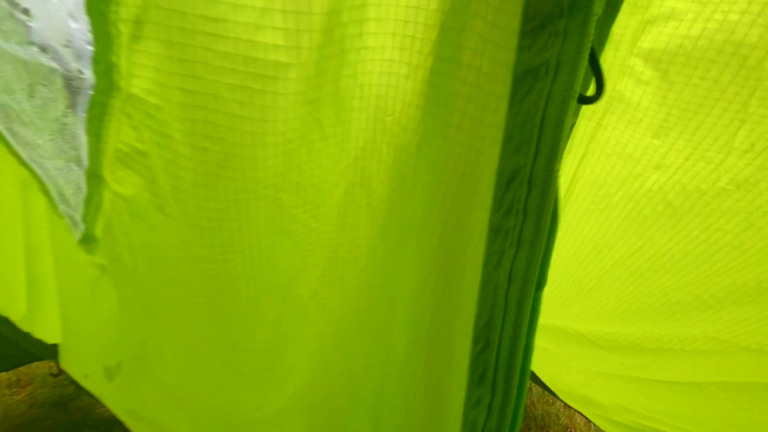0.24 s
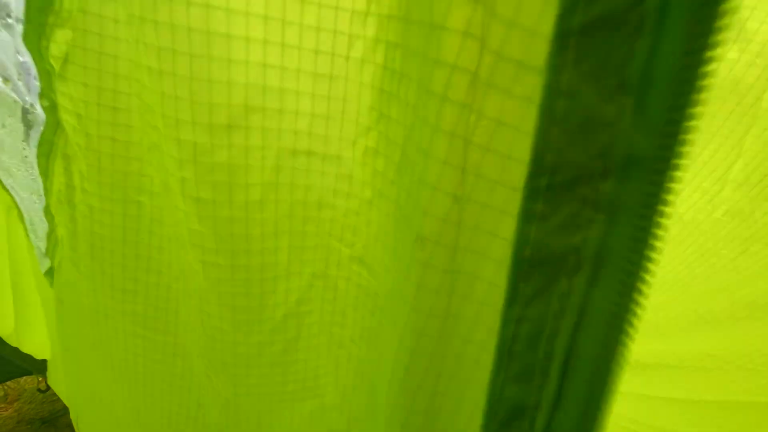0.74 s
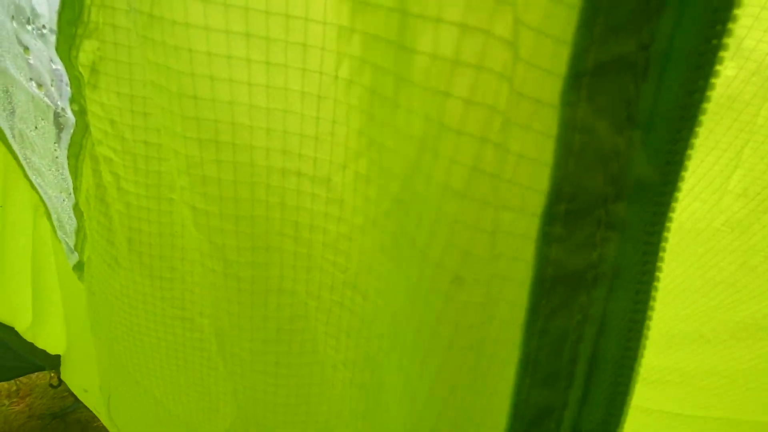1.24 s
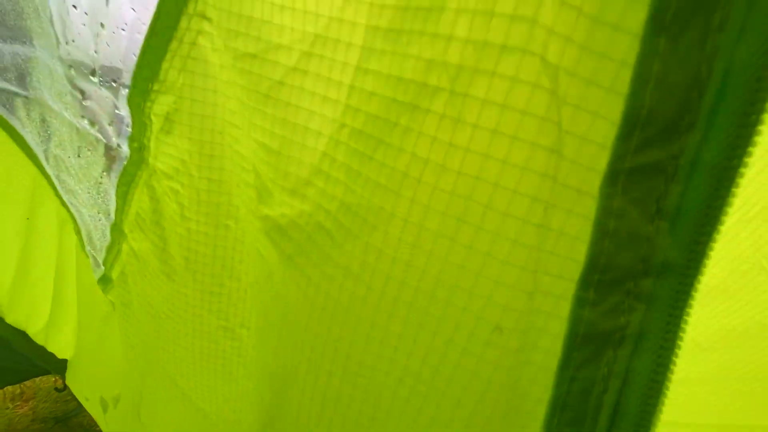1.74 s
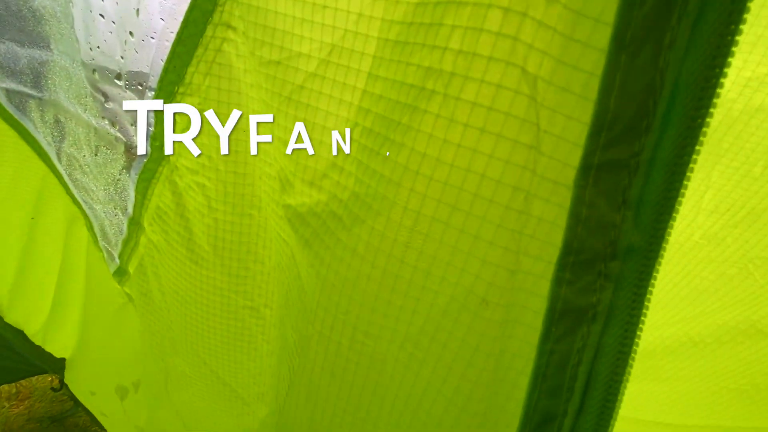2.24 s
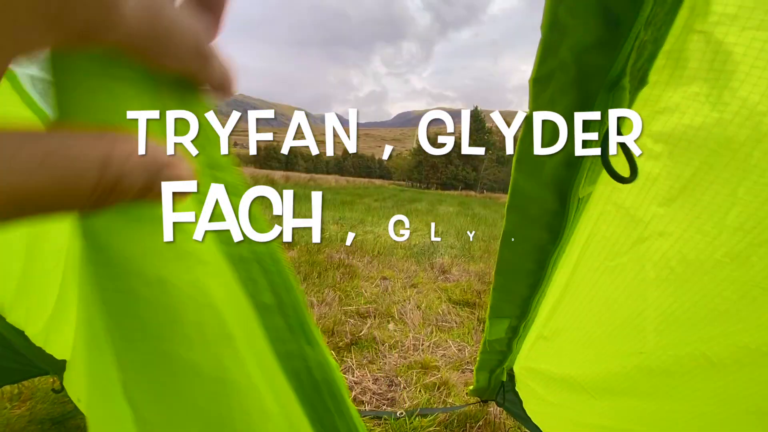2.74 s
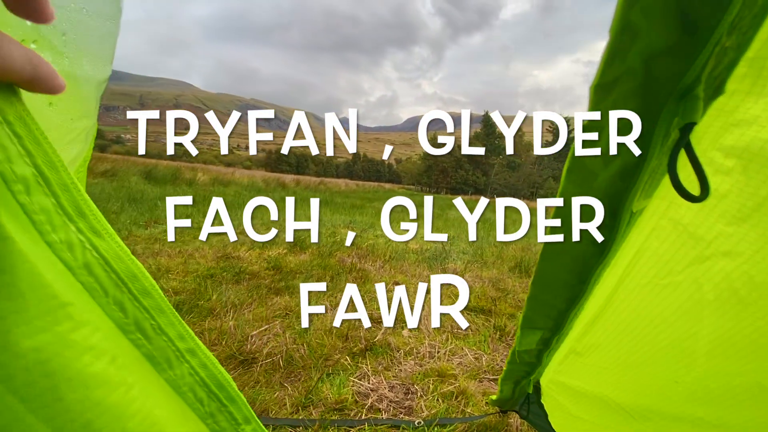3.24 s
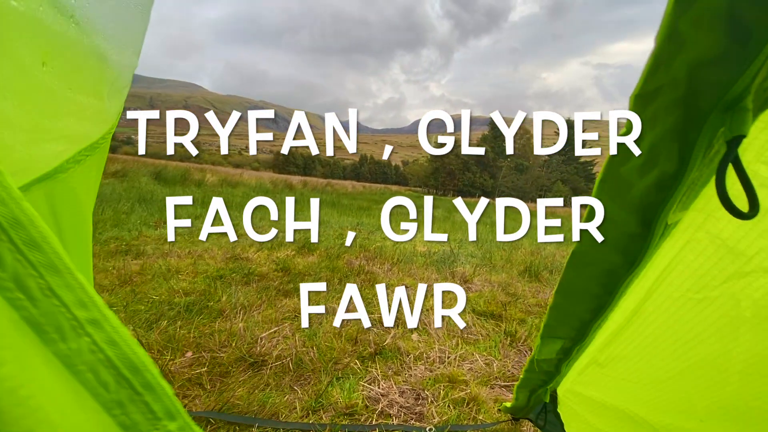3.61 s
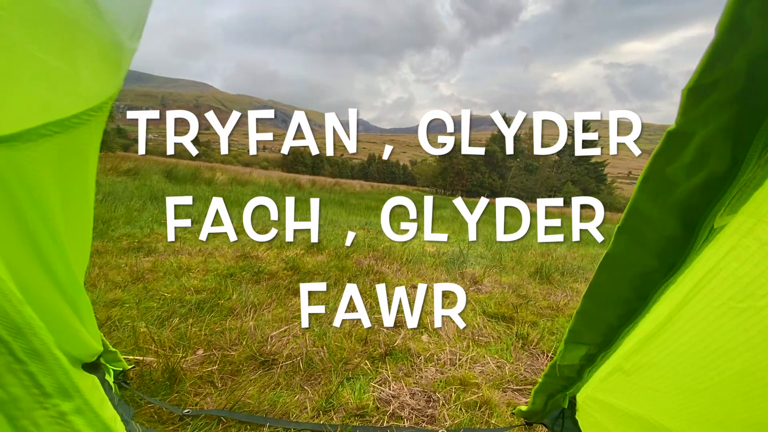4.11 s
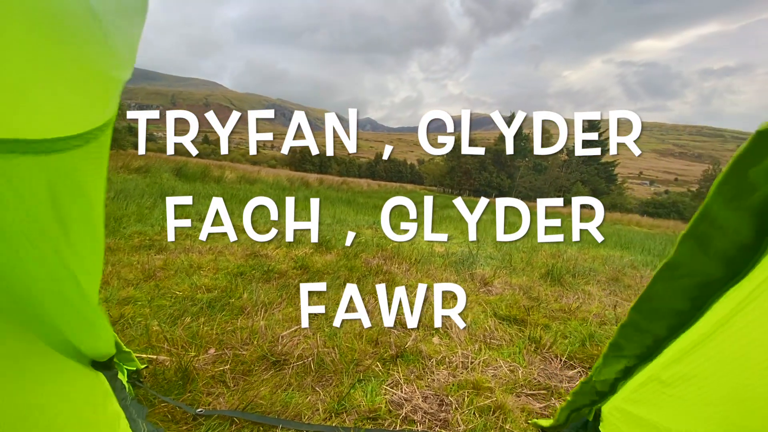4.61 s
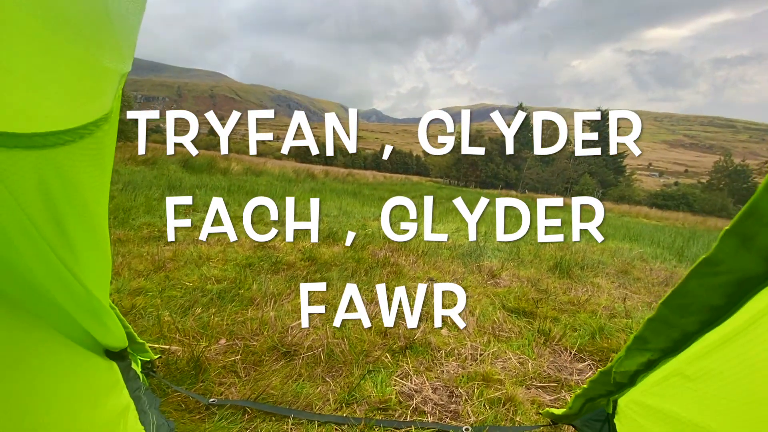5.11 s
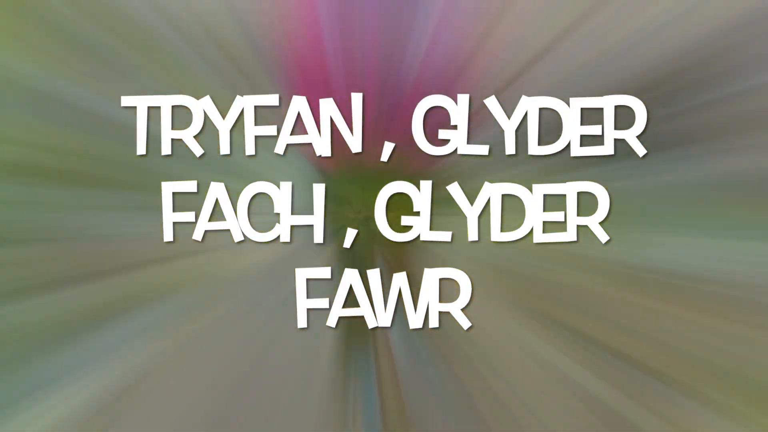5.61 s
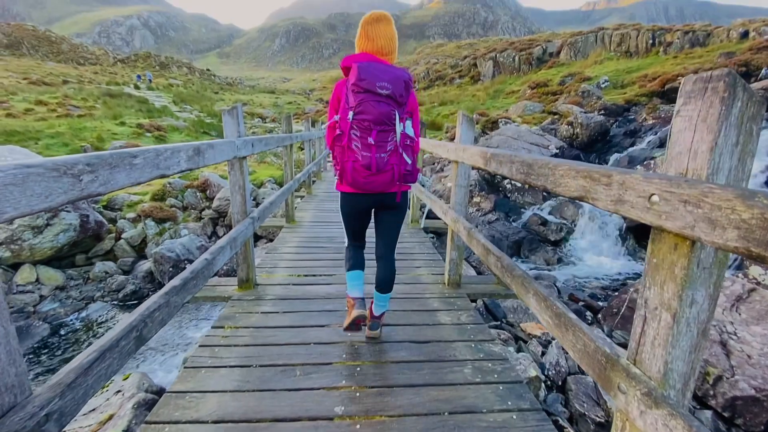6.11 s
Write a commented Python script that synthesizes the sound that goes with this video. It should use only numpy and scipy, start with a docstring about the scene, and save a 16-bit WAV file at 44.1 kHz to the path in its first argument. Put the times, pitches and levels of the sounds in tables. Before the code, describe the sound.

Close stereo sound from within a thin nylon tent: raspy zip bursts with low shakes of the taut wall, a quiet pause, fine ticks speeding up into a short high zip. After a bird-filled lull, fabric rubs and crackles, building to a violent run of snaps and thumps. Quiet outdoor air and quick chirps follow, then steady white water over rocks rises.

```python
"""Inside a small tent in open country: a zip is pulled in jerks, the door flap is swept aside and its stiff
fabric snaps close to the microphone; small birds and a far rumble outside. Then a mountain stream fades in.
Rubbing is banded noise, snaps and zip teeth are clicks and noise bursts through resonances, and the taut
wall answers with falling swings. Birds are bending sines; rumble and water are shaped noise."""
import sys
import numpy as np
from scipy import signal
from scipy.fft import rfft, irfft, next_fast_len
from scipy.io import wavfile

SR = 44100
rng = np.random.default_rng(int(sys.argv[2]) if len(sys.argv) > 2 else 0)


def wrap_up_sound(samples):
    """Save the sound to the file named by the first command line argument, as 16-bit audio."""
    columns = np.atleast_2d(samples).T
    # keep every value between -1 and 1, then stretch to whole-number steps
    tamed = np.clip(columns, -1, 1)
    steps = np.round(tamed * 32767).astype(np.int16)
    wavfile.write(sys.argv[1], SR, steps)


N = 280476
TIME_S = np.arange(N) / SR

# fabric snaps: (time [s], crack level [dB], body below 2300 Hz against the crack [dB], thump level [dB],
# left-right [dB])
FABRIC_SNAPS = [(2.5248, -27, -4, -52, -7), (2.985, -12, -8, -37, -5.5), (3.0882, 2, 7.5, -18.5, -8),
                (3.216, -11.5, 9.5, -34, 4), (3.228, -23, 14, -35, -9), (3.313, -26.5, 2, -40, 31),
                (3.331, -8, 7, -38, -3), (3.4713, 2.5, 4, -18, -5.5), (3.4994, -13, 9, -36, -2),
                (3.505, -14, 4, -45, -1), (3.545, -13, 0, -48, -4), (3.5509, -4.5, 8, -34, -0.5),
                (3.5783, -1, 5.5, -27, -3), (3.6531, 4, 0, -25, 2), (3.655, -19, 14.5, -42, -30),
                (3.683, 0, 6, -21.5, 0), (3.7085, -6.5, 4.5, -17, 12), (3.712, -1.5, 9, -28, -3),
                (3.7479, 2.5, -1, -19.5, 0), (3.782, -30, 2, -55, -8), (3.8852, -3, 10.5, -26.5, -2),
                (3.895, 0, 12.5, -25, -1.5), (4.009, -16, 3, -59, -3), (4.0532, 4, 0, -32, -2),
                (4.057, 0, 7.5, -26, 1), (4.078, -5.5, 5, -29, -4), (4.1105, -4.5, 7, -18.5, -14),
                (4.12, 7, 7.5, -17, 7), (4.1261, 6.5, 0.5, -15, -18), (4.15, -4, -12, -55, -1),
                (4.1622, -9, 4, -39, -10), (4.1738, 6, 3.5, -24.5, -5.5), (4.185, -15, 4, -48, -3),
                (4.2103, -1.5, 6, -23, -5), (4.23, -10, 9, -49, 2), (4.244, 0.5, 7.5, -25.5, -3),
                (4.277, 0, 7.5, -23, 1), (4.281, 4.5, 5, -30, -4), (4.292, -13, 12, -28, -1),
                (4.3247, 1, 1, -42, 1), (4.3279, 8.5, 9, -47, -5), (4.331, 9.5, 1, -14.5, 11),
                (4.337, 11.5, 1, -26, -2), (4.3406, 12, -4, -17, -23), (4.35, 10.5, 2, -17, 12),
                (4.3604, 5, 6, -17, 8), (4.3638, -1, -9, -41, 0), (4.369, 3, 7.5, -14, 10),
                (4.3724, -8, -2, -40, 10), (4.38, 0, 3, -25, 17), (4.388, -4, 7, -21, 11),
                (4.4005, 16.5, -4, -38, 11), (4.4009, 9.5, -23, -9, -6), (4.4562, -18, -8, -28, -2),
                (4.5624, -5.5, 13, -35, 0)]
# the flap tears free in one run of snaps: (time [s], level [dB])
TEAR_RUN = [(4.352, -36), (4.362, 0), (4.39, 8), (4.394, -2), (4.403, -31), (4.42, -38)]
# lead of the left port over the right for snaps: (frequency [Hz], phase [rad])
SNAP_LEFT_LEAD = [(0, 0), (1030, -3.0), (1720, -8.6), (2330, -7.4), (3360, -5.9), (4570, -6.7), (6800, 1.5),
                  (7580, 3.7), (8440, 7.5), (11900, 5.9), (12800, 3.5), (14300, 2.5), (15200, 0.1),
                  (15900, 0.1)]
SNAP_TREBLE_DB, TREBLE_DB_PER_DB = -2, -0.23   # treble against the crack; harder snaps are relatively duller
THUMP_LAG_S = 0.0012   # the wall answers a snap a moment later


def flap_snaps():
    """Sudden buckling of stiff fabric: a click and a noise burst ring its folds, then the wall thumps."""
    s, crack_db, body_db, thump_db, pan_db = np.transpose(FABRIC_SNAPS)
    clicks = np.array([impulses(s, crack_db + pan_db / 2), impulses(s, crack_db - pan_db / 2)])
    run_level = amp(in_time(TEAR_RUN)[0] + 1.6 * drift(120))
    run = run_level * (rng.random(N) < 700 / SR)   # about 700 snaps per second, at random
    noise = bursts(clicks + run * sides(-9.0), rise_s=0.0003, decay_s=0.0012, apart=0.55)
    noise = noise + amp(15.0) * clicks   # a sharp click heads each snap
    body_now_db = np.interp(TIME_S, s, body_db)
    treble_now_db = np.interp(TIME_S, s, SNAP_TREBLE_DB + TREBLE_DB_PER_DB * crack_db)
    cracks = fabric_colour(noise, body_now_db, treble_now_db, spread_db=2.2)
    wall = thumps(s + THUMP_LAG_S, thump_db, start_hz=740, end_hz=97.6, fall_s=0.00298, decay_s=0.013)
    return two_ports(cracks, SNAP_LEFT_LEAD) + wall * sides(-11.5)


# resonances of a snap: (centre [Hz], width [Hz], level [dB])
FABRIC_RESONANCES = [(840, 146, -7), (2010, 370, -10), (2630, 248, 2.5), (2910, 390, -3), (3630, 320, -5),
                     (4650, 1770, -8), (7600, 510, -2.5), (8470, 370, -3.5), (10200, 570, -7),
                     (13100, 1600, -8.5)]


def fabric_colour(x, body_db, treble_db, spread_db):
    """Parallel resonances of the stiff fabric; their strengths wander as the folds change."""
    out = 0
    for k, (hz, width_hz, db) in enumerate(FABRIC_RESONANCES):
        tilt_db = body_db * (hz < 2300) + treble_db * (hz > 6000)
        strength = amp(db + tilt_db + spread_db * drift(53.0))
        out = out + (-1) ** k * resonance(strength * x, hz, width_hz)
    return out


# the flap slides over the hand, rustles between the snaps, slides again and settles:
# (time [s], rasp level [dB], top hiss against the rasp [dB])
FLAP_RUB = [(2.352, -49, 8), (2.368, -45, 8), (2.412, -38, 4), (2.544, -47, -2.5), (2.564, -42.5, 5),
            (2.638, -42, 5), (2.65, -32.5, 1), (2.684, -43, 1.5), (2.744, -39.5, 7.5), (2.97, -42, -0.5),
            (3.28, -45.5, -6.5), (3.628, -38.5, -2), (3.738, -43.5, -5), (4.07, -44, -5), (4.122, -33, -3),
            (4.2, -38, -4), (4.26, -32.5, -4.5), (4.364, -31, 9.5), (4.41, -24, -8), (4.42, -33, -4),
            (4.452, -37, -1), (4.467, -27.5, -2), (4.551, -32.5, 6), (4.572, -30.5, -8), (4.585, -42, -3),
            (4.64, -47, -2), (4.773, -42.5, -2), (5.093, -51, -2.5), (5.145, -57, -9), (5.239, -58, 6),
            (5.4, -59, 7)]
# noise colour of the rubbing flap: (frequency [Hz], relative density [dB])
FLAP_SPECTRUM = [(18, -42), (30, -17), (59, -7.5), (157, -22), (199, -20.5), (336, -19.5), (988, -17),
                 (2010, -22), (2750, -18.5), (6050, -27.5), (11400, -23.5), (13300, -40), (14800, -40),
                 (16000, -15)]
# likeness of the two sides: (frequency [Hz], correlation [-1 to 1])
FLAP_CORRELATION = [(60, 0.91), (180, 0.38), (550, -0.12), (1650, -0.44), (4970, 0.11), (15000, 0.015)]
# shake, low rasp and hiss: (level at the mean rasp [dB], share of the rasp's swing followed [ratio])
FLAP_FOLLOWERS = [(-41.5, 1.46), (-45.5, 1.38), (-42.5, 1.19)]
# where the flap rubs: (time [s], left-right [dB])
FLAP_PAN = [(2.35, -1.5), (3.1, -0.5), (4.4, 2.5), (4.5, 1), (4.65, 0.5), (5.2, -1)]


def flap_rub():
    """Friction of sliding fabric: five ranges of grainy noise, four of them moving between the sides."""
    rasp_db, top_db = in_time(FLAP_RUB)
    shake_db, low_db, hiss_db = follow(rasp_db, FLAP_FOLLOWERS)
    grain = crumple(smooth_db=2.0, rate=17, per_s=60, click_db=-20.0, size=2)
    levels_db = [shake_db, low_db, rasp_db, hiss_db, rasp_db + top_db]
    shake, *rubbing = rubbed(levels_db, FLAP_SPECTRUM, FLAP_CORRELATION, grain, patchy_db=1.64)
    pan_db = np.interp(TIME_S, *np.transpose(FLAP_PAN))
    return shake * sides(2.1) + sum(rubbing) * sides(pan_db)


# zip pulls, two quick and one slow that ends in a jerk:
# (time [s], shake level of the tent wall [dB], rasp level [dB])
ZIP_PULLS = [(0, -4, -27), (0.022, -32, -35.5), (0.09, -15, -33), (0.16, -28, -29.5), (0.2, -24.5, -27),
             (0.25, -29, -34.5), (0.378, -20.5, -30.5), (0.44, -27, -47), (0.466, -52, -46.5),
             (0.51, -23.5, -47.5), (0.572, -29, -34.5), (0.652, -33, -35.5), (0.688, -25, -45),
             (0.722, -41, -61), (0.8, -50, -83), (0.862, -36, -64), (1.046, -31, -49), (1.132, -35, -55.5),
             (1.144, -23.5, -50), (1.25, -26.5, -39.5), (1.31, -23.5, -47.5), (1.37, -25.5, -45),
             (1.46, -32.5, -29), (1.532, -32, -34), (1.568, -29, -65), (1.62, -45, -60)]
# noise colour of the zip: (frequency [Hz], relative density [dB])
ZIP_SPECTRUM = [(18, -33), (30, -32), (59, 6), (227, -9.5), (364, -2), (426, -61), (486, -10.5),
                (4080, -14), (6050, -24.5), (10500, -5), (12000, -73), (13300, -59), (14800, -47),
                (16000, -45)]
# likeness of the two sides: (frequency [Hz], correlation [-1 to 1])
ZIP_CORRELATION = [(60, 0.76), (180, 0.55), (550, 0.67), (1650, 0.49), (4970, 0.012), (15000, 0.15)]
# low rasp, hiss and top hiss: (level at the mean rasp [dB], share of the rasp's swing followed [ratio])
ZIP_FOLLOWERS = [(-37.5, 0.9), (-41, 0.87), (-43, 0.87)]
TOOTH_PULSE_DB = 0.5   # the rasp swells with each passing tooth


def zip_rasp(turns):
    """Teeth pass the slider in grainy friction noise, while the pull shakes the tent wall."""
    grain = crumple(smooth_db=1.5, rate=21, per_s=210, click_db=-32.0, size=3.5)
    grain = grain * amp(TOOTH_PULSE_DB * np.cos(2 * np.pi * turns))
    shake_db, rasp_db = in_time(ZIP_PULLS)
    low_db, hiss_db, top_db = follow(rasp_db, ZIP_FOLLOWERS)
    levels_db = [shake_db, low_db, rasp_db, hiss_db, top_db]
    parts = rubbed(levels_db, ZIP_SPECTRUM, ZIP_CORRELATION, grain, patchy_db=2.0)
    shake, low, rasp, hiss, top = parts
    return shake * sides(-5.5) + (low + rasp) * sides(-0.96) + hiss * sides(0.47) + top * sides(-4.0)


# single zip teeth in the slow pull:
# (time [s], tick level [dB], slider ring level [dB], thump level [dB])
SLOW_TEETH = [(0.8528, -41, -55, -30), (0.912, -40, -46, -24), (0.954, -41.5, -36, -26),
              (0.992, -40, -36, -23), (1.024, -38, -46, -38), (1.044, -44, -50, -43),
              (1.051, -42, -19.5, -54), (1.081, -45, -46, -45), (1.107, -36, -49, -26),
              (1.1386, -34.5, -34, -37), (1.149, -36, -43, -42), (1.168, -35, -43, -24),
              (1.1791, -34, -39, -22), (1.189, -31, -43, -33), (1.198, -32.5, -39, -38),
              (1.206, -32.5, -40, -28), (1.221, -37, -36, -29), (1.233, -35, -37, -33),
              (1.244, -31, -32, -25), (1.251, -35, -35, -31), (1.265, -39, -37, -40),
              (1.2792, -29, -28, -24), (1.2864, -33, -22.5, -21), (1.295, -35, -24, -35),
              (1.317, -34, -24, -42), (1.334, -30, -22, -25), (1.341, -36, -32, -32),
              (1.355, -45, -41, -43), (1.377, -35, -36, -40), (1.388, -36, -34, -39),
              (1.397, -32, -32, -27), (1.413, -35, -19.5, -38)]


def zip_teeth():
    """In the slow pull each tooth ticks, rings slider and tape, and makes the wall swing."""
    s, tick_db, ring_db, thump_db = np.transpose(SLOW_TEETH)
    ticks = bursts(impulses(s, tick_db)[None], rise_s=0.00051, decay_s=0.0039, apart=0.67)
    ring = bursts(impulses(s, ring_db)[None], rise_s=0.0002, decay_s=0.0022, apart=1.0)
    ticks = signal.sosfilt(signal.butter(1, [400, 10500], "band", fs=SR, output="sos"), ticks)
    slider = resonance(ring, 5200, 2800)
    tape = amp(20.5) * resonance(ticks, 670, 380)
    swings = thumps(s, thump_db, start_hz=230, end_hz=86.0, fall_s=0.0027, decay_s=0.029)
    return (ticks + slider + tape) * sides(0.47) + swings * sides(-5.5)


# speed of the quick pulls and the closing jerk, one table each:
# (time [s], teeth per second [Hz], buzz level [dB])
QUICK_PULLS = [
    [(0, 93.8, -29), (.06, 97.3, -39), (.1, 109.9, -22.5), (.16, 120.7, -23.5), (.176, 201, -22.5),
     (.195, 255.4, -18.5), (.21, 289.2, -24), (.228, 216.4, -16.5), (.248, 177.6, -29.5), (.27, 116, -22.5),
     (.29, 232.3, -26), (.325, 149.8, -26.5), (.345, 197.2, -27.5), (.4, 194.1, -36), (.43, 110.2, -45)],
    [(.545, 92.7, -27), (.57, 148.7, -22), (.6, 239.2, -32), (.63, 228.4, -40.5), (.66, 235.6, -32),
     (.68, 179, -46)],
    [(1.415, 229.2, -23), (1.43, 297, -39), (1.447, 256.5, -28), (1.462, 351, -36), (1.475, 561.6, -30),
     (1.49, 476, -27), (1.5, 340, -25), (1.515, 386, -25), (1.527, 430, -28), (1.55, 249, -38)],
]


def tooth_turns():
    """Running count of passing teeth: the sum of an unsteady tooth rate, which also bridges the pulls."""
    s, hz, _ = np.transpose(sum(QUICK_PULLS, []))
    return np.cumsum(np.interp(TIME_S, s, hz) * (1 + 0.0144 * drift(56.6))) / SR


# ring of tape and slider at each tooth of a quick pull: (centre [Hz], width [Hz], level [dB])
TAPE_RESONANCES = [(870, 330, -6.5), (1500, 105, 0.5), (1750, 390, 1.5), (2530, 110, -4), (3530, 200, -15),
                   (4060, 200, -15)]
TAPE_WANDER_DB = 3   # the rings change strength as the tape bends
OVERTONE_DB = -6.5   # loss per doubling of the overtone number
TOOTH_CLICK_DB, TOOTH_SPREAD_DB = 18, 4.5   # click against the buzz; how unevenly the teeth bite


def zip_buzz(turns):
    """In a quick pull the teeth hum at their rate with uneven overtones, and click into tape and slider."""
    level = sum(amp(in_time(pull)[1]) for pull in QUICK_PULLS)
    tones = 0
    for k in range(1, 7):
        strength = amp(OVERTONE_DB * np.log2(k) + 3.1 * drift(31))
        tones = tones + strength * np.sin(2 * np.pi * k * turns)
    passing = np.diff(np.floor(turns), prepend=0)   # 1 at the sample where a tooth passes
    bites = passing * level * amp(TOOTH_CLICK_DB + TOOTH_SPREAD_DB * rng.standard_normal(N))
    clicks = 0
    for k, (hz, width_hz, db) in enumerate(TAPE_RESONANCES):
        strength = amp(db + TAPE_WANDER_DB * drift(12.0))
        clicks = clicks + (-1) ** k * resonance(strength * bites, hz, width_hz)
    return np.sqrt(2) * level * tones * sides(-3.5) + clicks * sides(-1.8)


# a narrow band sings while the zip or the flap is rubbed: # (start [s], length [s], first pitch [Hz], last
# pitch [Hz], level at the height [dB])
SINGING_SCRAPES = [(0, 0.11, 1430, 1400, -30), (0, .15, 4120, 4060, -37), (.25, .05, 3650, 3480, -38),
                   (.56, .1, 2400, 2550, -40), (0.003, .07, 2100, 1950, -35), (0.006, .06, 2550, 2500, -37),
                   (0.148, 0.1, 1017, 1147, -36), (.155, .095, 1800, 1900, -33), (.32, .05, 1950, 2100, -35),
                   (1.4, 0.09, 2760, 2720, -29), (1.42, 0.035, 2100, 2550, -33),
                   (1.458, 0.04, 1800, 1200, -30), (1.445, .05, 3700, 3750, -36),
                   (2.37, .09, 1450, 1350, -48), (2.38, .08, 3950, 3800, -50), (2.55, .09, 2750, 2850, -50),
                   (2.72, .13, 3400, 3350, -47), (2.7, .1, 2950, 2900, -49), (2.72, .12, 4150, 4300, -47),
                   (2.8, .13, 4550, 4750, -46), (2.88, .08, 2600, 2900, -50), (3.52, .05, 2900, 3000, -41),
                   (3.6, .05, 3000, 3300, -43), (4.465, 0.095, 2650, 3250, -34),
                   (4.46, .045, 1150, 1050, -28), (4.505, 0.055, 880, 1150, -24),
                   (4.47, .07, 5000, 5050, -42), (4.47, .05, 5780, 5750, -42),
                   (4.725, 0.26, 1514, 1470, -48)]
# lead of the left port over the right for close rubbing: (frequency [Hz], phase [rad])
RUB_LEFT_LEAD = [(0, 0), (1000, 2.4), (2410, 4.5), (3010, 7.0), (4820, 12.5), (6030, 15.8)]
SCRAPE_PEAK_AT, SCRAPE_START_DB, SCRAPE_END_DB = 0.45, -7, -8   # share of length; ends against the peak
SCRAPE_STEADY = 0.7   # steady whistle against the narrow noise
FLAP_START_S = 2.3   # from here on the rubbing is close to the microphone


def scrapes():
    """Rubbing makes narrow bands sing: narrow noise with a faint whistle on a gliding centre pitch."""
    out = np.zeros((2, N))
    for start, length, first_hz, last_hz, db in SINGING_SCRAPES:
        on, done, shape_db = swell(start, length, SCRAPE_PEAK_AT, SCRAPE_START_DB, SCRAPE_END_DB)
        hz = first_hz + (last_hz - first_hz) * done
        low_pass = signal.butter(2, 0.045 * hz.mean(), fs=SR, output="sos")
        slow = signal.sosfilt(low_pass, rng.standard_normal((3, len(done) + 2000)))
        slow = rms_one((slow[0] + 0.3 * slow[1:])[:, 2000:])   # the filter's start is left out
        carrier = np.sin(2 * np.pi * np.cumsum(hz) / SR)
        out[:, on] += amp(db + shape_db) * (slow + SCRAPE_STEADY) * carrier
    close = two_ports(out, RUB_LEFT_LEAD) * sides(6.2)
    return np.where(TIME_S < FLAP_START_S, out, close)


# dull knocks: (time [s], crack level [dB], thump level [dB])
DULL_KNOCKS = [(0.5, -20, -26.5), (0.531, -14.5, -31), (1.752, -16, -19), (1.767, -23, -29.5),
               (2.498, -19, -31), (2.644, -38, -30), (4.568, -8.5, -23.5)]
# the wall swings out: (time [s], peak level [dB], first pitch [Hz], decay [s])
WALL_SWINGS = [(0.551, -11, 131, 0.011), (0.672, -19, 112.7, 0.023), (0.689, -16.5, 102, 0.019),
               (2.657, -23.5, 109, 0.019), (4.13, -13, 126, 0.0058), (4.406, 1, 101, 0.021),
               (4.581, -12.5, 126, 0.015)]
WALL_HZ = 48.7   # pitch towards which each swing falls


def knocks():
    """Dull blows on the wall or pole, and slow swings of the whole wall."""
    s, crack_db, thump_db = np.transpose(DULL_KNOCKS)
    cracks = bursts(impulses(s, crack_db)[None], rise_s=0.00097, decay_s=0.0035, apart=1.0)
    cracks = signal.sosfilt(signal.butter(2, 1800, fs=SR, output="sos"), cracks)
    blows = thumps(s, thump_db, start_hz=466, end_hz=100, fall_s=0.0056, decay_s=0.01)
    swings = 0
    for s, db, first_hz, decay_s in WALL_SWINGS:
        swings = swings + thumps([s], db, first_hz, WALL_HZ, 0.0094, decay_s)
    return cracks + blows * sides(-6) + swings * sides(-7.0)


# bird notes: (start [s], length [s], first pitch [Hz], middle pitch [Hz], last pitch [Hz],
# peak level [dB], left-right [dB])
BIRD_NOTES = [(0.415, 0.018, 3600, 3450, 3240, -35, -12), (0.436, .018, 3620, 3700, 3650, -38, -9),
              (0.737, 0.063, 2880, 3050, 2920, -53.5, -13), (0.817, 0.085, 2900, 2940, 2950, -58, -12),
              (0.822, 0.027, 3950, 3900, 3800, -60, -3), (1.002, .035, 2900, 2920, 2850, -50, -4),
              (1.01, .03, 3500, 3530, 3520, -54, -3), (1.606, 0.031, 4120, 4000, 3880, -44, 3),
              (1.64, 0.026, 3870, 3720, 3650, -46, 4), (1.669, 0.069, 3580, 3530, 3440, -45.5, -1),
              (1.646, 0.039, 3280, 3100, 2800, -43, -2), (1.695, .028, 2600, 2530, 2450, -54, -5),
              (1.738, 0.035, 2680, 2930, 2950, -43, -4), (1.764, 0.032, 3660, 3700, 3330, -51, -2),
              (1.773, 0.026, 2980, 3000, 2620, -42.5, -6), (1.84, 0.055, 2960, 3150, 3010, -46, -1),
              (1.858, 0.042, 3360, 3550, 3340, -50, -8), (1.896, 0.03, 2980, 2740, 2570, -51, -5),
              (2.07, 0.047, 3600, 3490, 3400, -60, -4), (2.201, 0.11, 8150, 8220, 7950, -49.5, -14),
              (2.202, 0.04, 4050, 3850, 3650, -60, -3), (2.245, .06, 3780, 3870, 3800, -66, -3),
              (2.315, 0.03, 7800, 7300, 7150, -47, -11), (2.45, 0.074, 8550, 8200, 8100, -49.5, -14),
              (3.045, 0.032, 3900, 3880, 3970, -30.5, -5), (3.097, 0.013, 3800, 3620, 3330, -42, -8),
              (3.127, .009, 3780, 3650, 3450, -46, -4), (3.135, 0.018, 3480, 3300, 3100, -41, -12),
              (3.891, 0.089, 3870, 3810, 3760, -41.5, -3), (3.989, 0.032, 3800, 3710, 3680, -38, -8),
              (4.968, 0.013, 3880, 3960, 3950, -39, -1), (4.986, 0.018, 3650, 3770, 3780, -36, 1),
              (5.002, 0.02, 4170, 4080, 4020, -36, -2), (5.03, 0.009, 3600, 3900, 4100, -36, -5),
              (5.037, 0.0063, 4050, 3900, 3800, -30, -1), (5.042, 0.01, 3850, 4030, 4080, -36, -1),
              (5.074, 0.015, 3630, 3320, 3230, -36, -15), (5.105, .018, 3270, 3280, 3330, -53, -10),
              (5.125, 0.008, 3850, 3790, 3750, -45, -7), (5.137, 0.017, 3720, 3560, 3680, -37, -7),
              (5.152, 0.013, 3550, 3600, 3900, -29.5, -4), (5.177, 0.019, 4260, 4330, 4370, -33.5, -1),
              (5.221, 0.0091, 3930, 3760, 3680, -31.5, -4), (5.228, .007, 3680, 3800, 3870, -39, -4),
              (5.236, .008, 3800, 3760, 3700, -47, -5), (5.273, 0.019, 3980, 3770, 3220, -37.5, -4),
              (5.283, 0.0099, 3280, 3350, 3520, -35.5, -9), (5.34, 0.022, 4130, 4050, 3780, -41, -5),
              (5.357, .018, 3470, 3410, 3400, -37, -9), (5.424, 0.018, 3800, 3840, 3800, -38, 1)]
# lead of the left port over the right for birds: (frequency [Hz], phase [rad])
BIRD_LEFT_LEAD = [(0, 2.4), (2600, 2.4), (3000, 3.1), (3380, 2.8), (3580, 4.9), (3750, 5.8), (3900, 5.9),
                  (4100, 5.3), (4300, 5.0), (8000, 6.3)]
NOTE_PEAK_AT, NOTE_START_DB, NOTE_END_DB = 0.4, -3, -4   # share of length; ends against the peak
NOTE_EDGE_S = 0.0016   # fade at both ends of a note


def birds():
    """Near-sine notes bend through three pitches, with fast flutter and throb and a faint outdoor echo."""
    song = np.zeros((2, N))
    flutter, throb_db = drift(130), 3 * drift(90)
    for start, length, *hz, db, pan_db in BIRD_NOTES:
        on, done, shape_db = swell(start, length, NOTE_PEAK_AT, NOTE_START_DB, NOTE_END_DB)
        edge = np.clip(np.minimum(done, 1 - done) * length / NOTE_EDGE_S, 0, 1)
        bend = np.polyval(np.polyfit([0, .5, 1], hz, 2), done)
        pitch = bend * (1 + .005 * flutter[on])
        level = edge * amp(db + shape_db + throb_db[on])
        song[:, on] += sides(pan_db) * level * np.sin(2 * np.pi * np.cumsum(pitch) / SR)
    tail = np.arange(int(.08 * SR)) / SR
    # scattered by bushes
    echoes = amp(-34.5) * rng.standard_normal((2, len(tail))) * np.exp(-tail / 0.033)
    echoes[0, int(.024 * SR)] = echoes[1, int(.028 * SR)] = amp(-23.5)   # a near slope
    return two_ports(song, BIRD_LEFT_LEAD) + signal.fftconvolve(song, echoes, axes=1)[:, :N]


# noise colour of the mountain stream: (frequency [Hz], relative density [dB])
STREAM_SPECTRUM = [(18, -54), (30, -21), (93, -3), (259, -0.5), (569, -7.5), (866, -5), (1280, -10.5),
                   (2170, -11.5), (6550, -20), (7670, -22), (11400, -22), (12600, -32), (13700, -65),
                   (14800, -26), (16000, -43)]
# likeness of the two sides: (frequency [Hz], correlation [-1 to 1])
STREAM_CORRELATION = [(60, 0.85), (120, 0.91), (240, 0.84), (480, 0.15), (950, -0.5), (1890, 0.0052),
                      (3770, -0.19), (7520, 0.36), (15000, -0.31)]
STREAM_DB, STREAM_START_S = -14, 5.077
POOL_HZ, POOL_WIDTH_HZ, POOL_DB = 860, 330, -3   # the hollow between the rocks lifts a band of the wash


def stream():
    """White water over rocks: a dense wash of noise, slightly grainy and patchy."""
    grain = amp(0.6 * drift(37))
    wash = banded_noise(STREAM_SPECTRUM, STREAM_CORRELATION, grain, patchy_db=0.8).sum(axis=0)
    wash = wash + amp(POOL_DB) * resonance(wash, POOL_HZ, POOL_WIDTH_HZ)
    fade_in = np.sin(crossfade(STREAM_START_S)) ** 2
    return amp(STREAM_DB) * fade_in * rms_one(wash) * sides(0.077)


# noise colour of the open-country floor: (frequency [Hz], relative density [dB])
FIELD_SPECTRUM = [(15, -54), (25, -30), (36, -34), (59, -10.5), (102, -16), (200, -15), (531, -28),
                  (591, -3), (677, -29), (863, -32.5), (8140, -47), (13200, -54), (16000, -90)]
# likeness of the two sides: (frequency [Hz], correlation [-1 to 1])
FIELD_CORRELATION = [(60, -0.12), (180, 0.66), (550, -0.072), (1650, 0.054), (4970, -0.84), (15000, 1)]
FIELD_DB = -42   # level of the air, before it fades
FIELD_FADE_START_S = 4.6   # the field starts to sink a little before the stream enters


def field():
    """Far rumble with a low drone of resonant noise, and the air of open country."""
    air = rms_one(banded_noise(FIELD_SPECTRUM, FIELD_CORRELATION, grain=1, patchy_db=1.8).sum(axis=0))
    drone = rms_one(resonance(resonance(rng.standard_normal(N), 56.0, 26), 56.0, 26))
    fade_out = np.cos(crossfade(FIELD_FADE_START_S))
    return amp(FIELD_DB) * fade_out * (air + amp(-3.0) * drone * sides(-4.0))


FADE_S = 1.267


def crossfade(start_s):
    """Quarter turn from the tent (0) to the stream (pi / 2)."""
    return np.pi / 2 * np.clip((TIME_S - start_s) / FADE_S, 0, 1)


def amp(db):
    """dB to gain."""
    return 10 ** (np.asarray(db) / 20)


def rms_one(x):
    """Scale to rms 1."""
    return x / np.sqrt(np.mean(x ** 2) + 1e-20)


def in_time(rows):
    """Columns of a curve table at every sample, -120 dB outside its span."""
    s, *columns = np.transpose(rows)
    return [np.interp(TIME_S, s, c, -120, -120) for c in columns]


def at_hz(points, hz):
    """Read a spectrum on a log-frequency axis."""
    point_hz, value = np.transpose(points)
    return np.interp(np.log(hz), np.log(point_hz), value)


def drift(rate):
    """Slow chance of spread 1: noise low-passed at the rate in Hz, made at every 20th sample."""
    r = np.exp(-40 * np.pi * rate / SR)
    slow = signal.lfilter([1], [1, -2 * r, r * r], rng.standard_normal(N // 20 + 3002))[3000:]
    return np.interp(np.arange(N) / 20, np.arange(len(slow)), rms_one(slow))


def sides(pan_db):
    """Left and right gains for a left-right difference in dB."""
    return amp(np.array([[.5], [-.5]]) * pan_db)


def banded_noise(spectrum, likeness, grain, patchy_db):
    """Half-octave bands of stereo noise under a shared grain, gathered in five ranges, bass to treble."""
    parts, edges = np.zeros((5, 2, N)), 25 * 2 ** np.arange(0, 9.6, .5)
    white = rng.standard_normal((2, 2, N)) * grain
    for k, (low, high) in enumerate(zip(edges, edges[1:])):
        band = signal.butter(2, [low, high], "band", fs=SR, output="sos")
        mid, side = signal.sosfilt(band, white[k % 2])
        hz = np.sqrt(low * high)
        alike = np.clip(at_hz(likeness, hz), -1, 1)
        gain = amp(at_hz(spectrum, hz) + patchy_db * drift(10.6))
        part = np.searchsorted([250, 900, 3200, 7500], hz)
        parts[part] += gain * (np.sqrt(1 + alike) * mid + np.sqrt(1 - alike) * side * [[1], [-1]])
    return parts


def rubbed(levels_db, spectrum, likeness, grain, patchy_db):
    """Friction noise whose five ranges play at the given levels."""
    parts = banded_noise(spectrum, likeness, grain, patchy_db)
    return [amp(db) * rms_one(part) for db, part in zip(levels_db, parts)]


MEAN_RASP_DB = -40


def follow(rasp_db, ranges):
    """Levels of neighbouring ranges that rise and fall with the rasp."""
    return [db + share * (rasp_db - MEAN_RASP_DB) for db, share in ranges]


def crumple(smooth_db, rate, per_s, click_db, size):
    """Grain of rubbed fabric: a fast uneven level with short creases on top."""
    crease_db = click_db + 11.8 * np.minimum(rng.exponential(1, N), size)
    creases = (rng.random(N) < per_s / SR) * amp(crease_db)
    decay = np.exp(-1 / (0.000355 * SR))
    return amp(smooth_db * drift(rate)) + signal.lfilter([1], [1, -decay], creases)


def impulses(times, db):
    """One click of the given level at each time."""
    clicks = np.zeros(N)
    clicks[(np.asarray(times) * SR).astype(int)] = amp(db)
    return clicks


def thumps(times, db, start_hz, end_hz, fall_s, decay_s):
    """A wave runs through the taut wall, highs first: a short falling swing after each blow."""
    t = np.arange(int(.12 * SR)) / SR
    hz = end_hz + (start_hz - end_hz) * np.exp(-t / fall_s)
    swing = np.sin(2 * np.pi * np.cumsum(hz) / SR) * np.exp(-t / decay_s)
    return signal.fftconvolve(impulses(times, db), swing)[:N]


def bursts(clicks, rise_s, decay_s, apart):
    """Each click opens a few milliseconds of noise, partly different on the two sides."""
    t = np.arange(int(.04 * SR)) / SR
    shape = (1 - np.exp(-t / rise_s)) * np.exp(-t / decay_s)
    white = rng.standard_normal((3, N))
    return signal.fftconvolve(clicks, shape[None])[:, :N] * (white[0] + apart * white[1:])


def resonance(x, hz, width_hz):
    """Two-pole band-pass with a gain of about 1 at its centre."""
    r = np.exp(-np.pi * width_hz / SR)
    zeros = (1 - r * r) / 2 * np.array([1, 0, -1])
    poles = [1, -2 * r * np.cos(2 * np.pi * hz / SR), r * r]
    return signal.lfilter(zeros, poles, x + 1e-18)


def two_ports(x, phase):
    """A source reaches the two microphone ports with a phase difference that depends on pitch."""
    size = next_fast_len(N)
    hz, lead = np.transpose(phase)
    turn = np.interp(np.arange(size // 2 + 1) * SR / size, hz, lead)
    right = irfft(rfft(x[1], size) * np.exp(-1j * turn), size)[:N]
    return np.array([x[0], right])


def swell(start, length, peak_at, start_db, end_db):
    """Samples of an event, its progress 0-1, and a level that rises to 0 dB and falls."""
    on = slice(int(start * SR), int((start + length) * SR))
    done = np.linspace(0, 1, on.stop - on.start)
    return on, done, np.interp(done, [0, peak_at, 1], [start_db, 0, end_db])


def scene():
    """All sources at the microphone."""
    turns = tooth_turns()
    door = flap_snaps() + flap_rub()
    zipper = zip_rasp(turns) + zip_teeth() + zip_buzz(turns)
    return door + zipper + scrapes() + knocks() + birds() + stream() + field()


# the treble dips at: (centre [Hz], width [Hz], depth [0-1])
TREBLE_NOTCHES = [(5940, 640, 0.42), (7670, 300, 1), (13100, 2770, 0.84)]
CUTOFF_HZ = 15800


def record(dry):
    """The deepest bass is lost, the treble dips at a few pitches, peaks round off and clip, the top is cut."""
    dry = signal.sosfilt(signal.butter(2, 36, "high", fs=SR, output="sos"), dry)
    for hz, width_hz, depth in TREBLE_NOTCHES:
        dry = dry - depth * resonance(dry, hz, width_hz)
    loud = 1.017 * np.tanh(dry / 1.299)
    top_cut = signal.ellip(10, .5, 70, CUTOFF_HZ, fs=SR, output="sos")
    return signal.sosfilt(top_cut, np.clip(loud, -.93, .93))


dry = scene()
out = record(dry)
wrap_up_sound(out)
```